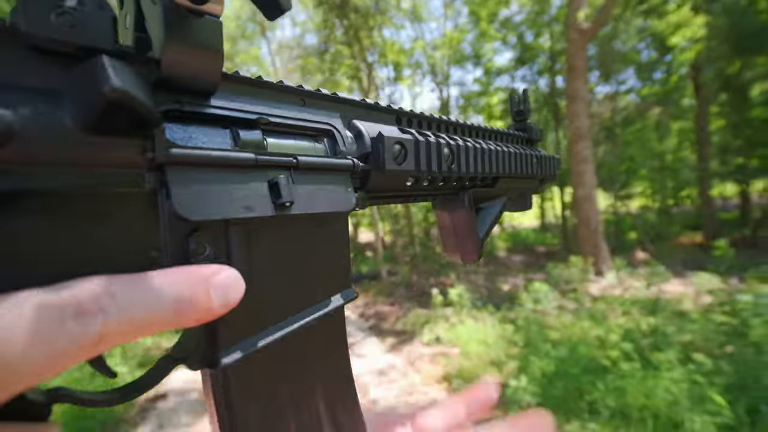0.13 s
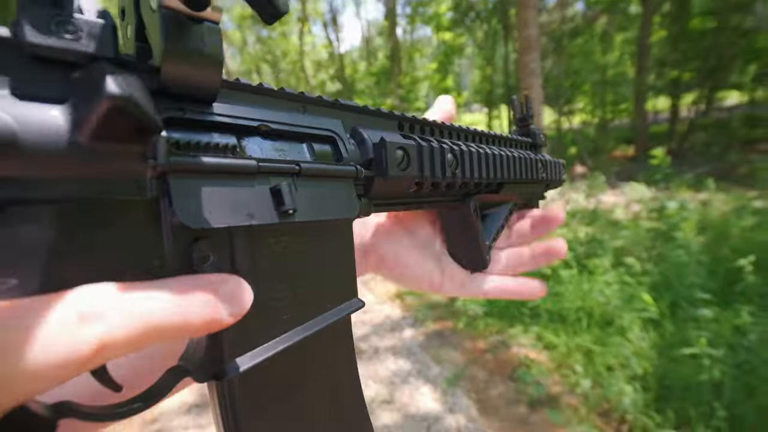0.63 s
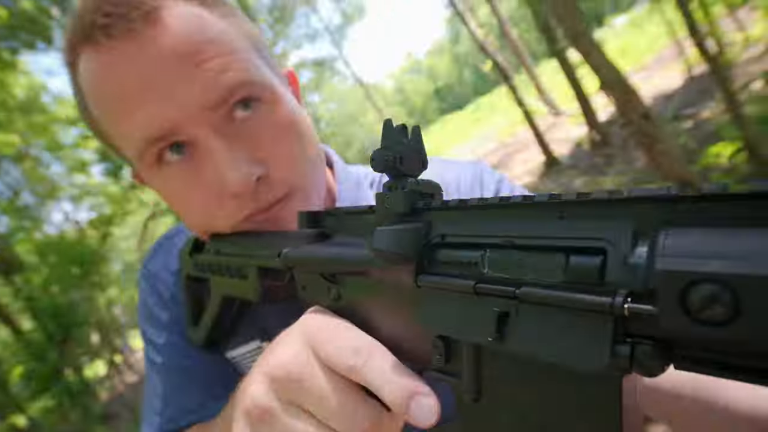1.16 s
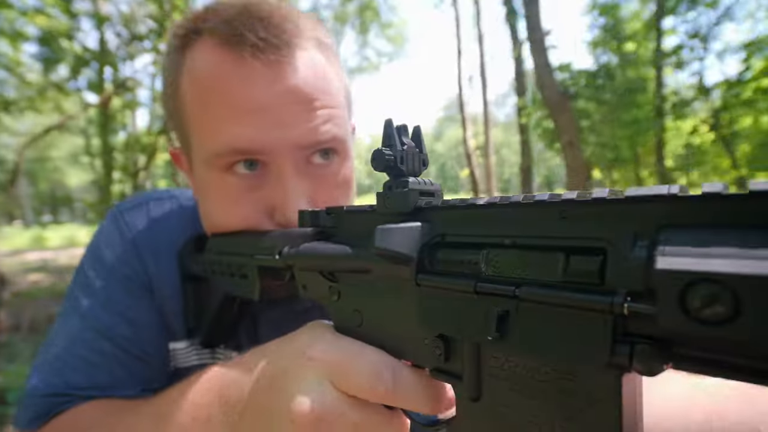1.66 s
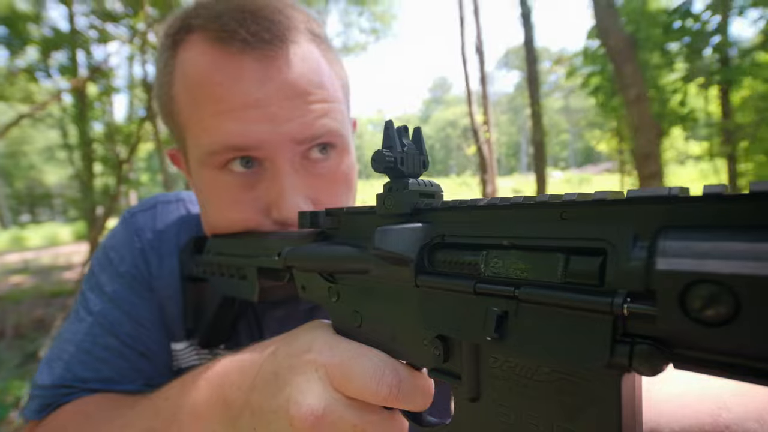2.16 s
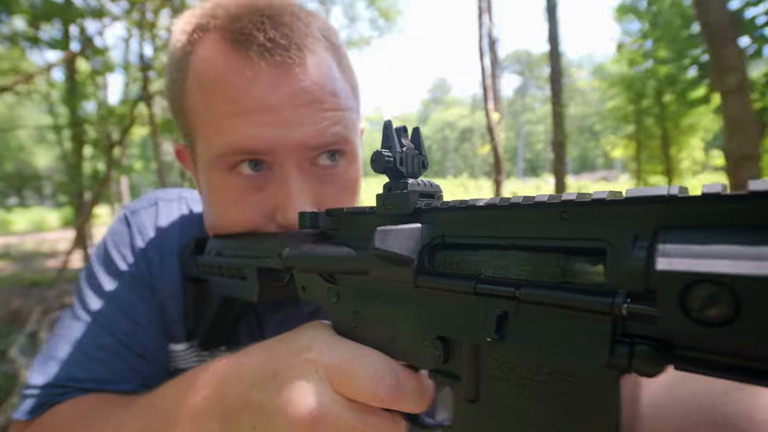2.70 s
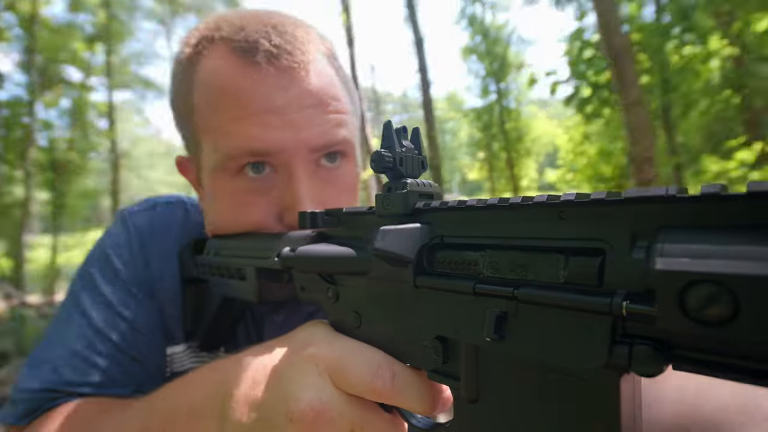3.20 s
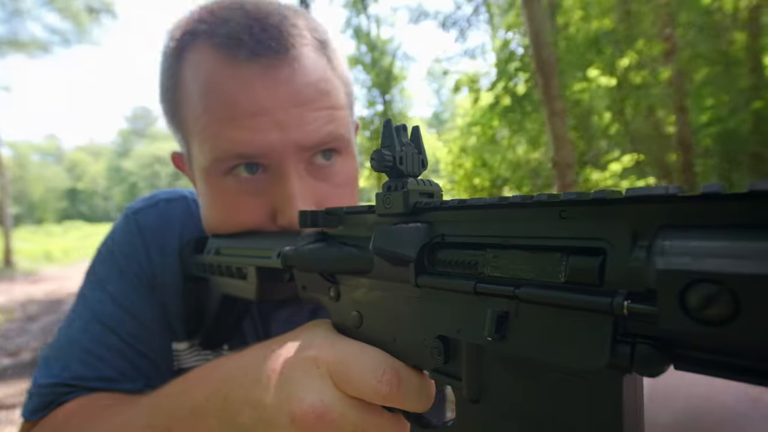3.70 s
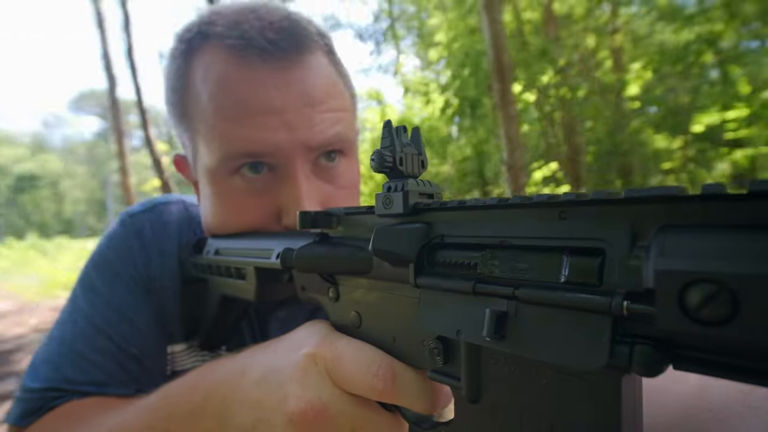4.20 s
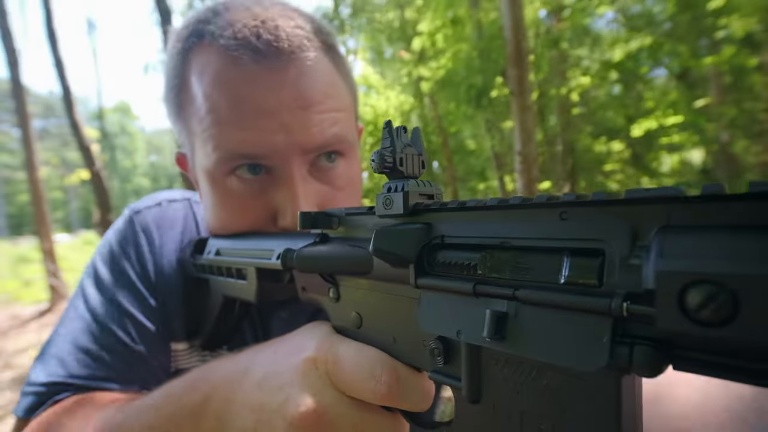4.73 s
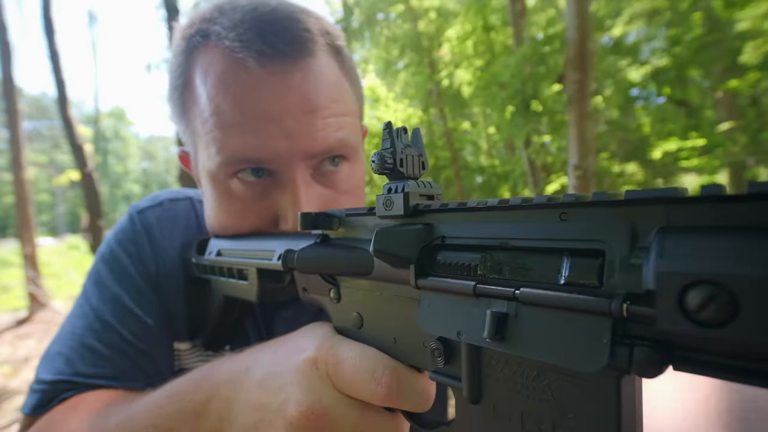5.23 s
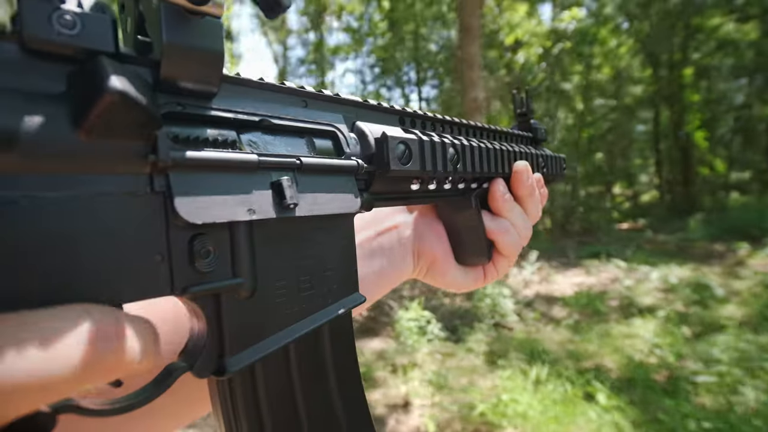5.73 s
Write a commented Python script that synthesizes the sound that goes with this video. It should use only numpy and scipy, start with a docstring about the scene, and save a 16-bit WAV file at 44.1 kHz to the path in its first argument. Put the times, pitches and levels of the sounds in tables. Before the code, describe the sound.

A magazine is slapped into a gas-powered BB rifle, a lever clicks, then eleven sharp, clacking shots crack out unevenly among trees.

```python
"""Gas blowback air rifle among trees

A magazine is slapped home and a lever clicks; then eleven shots, the last cut short by the end.
A cycle: sear tick, valve burst, muzzle pop, bolt slam, bolt return, bounce, at times a trigger reset.
Blows are noise bursts through resonances; gas is pressure pulses and coloured noise, with puffs.
The trees' echo is noise convolved with a decaying tail; hands rustle and wind rumbles."""
import sys
import numpy as np
from scipy import signal
from scipy.fft import rfft, irfft
from scipy.io import wavfile
from scipy.ndimage import uniform_filter1d, map_coordinates

SR = 44100
rng = np.random.default_rng(int(sys.argv[2]) if len(sys.argv) > 2 else 0)


def digitize_waveform(pressure):
    """Quantize a signal to 16-bit integers and store it at the path in sys.argv[1].

    Rows of a 2-D input are taken as channels; values are limited to [-1, 1].
    """
    field = np.atleast_2d(pressure).T
    bounded = np.clip(field, -1, 1)
    quanta = np.round(bounded * 32767).astype(np.int16)
    wavfile.write(sys.argv[1], SR, quanta)


def invert_db(level):
    """Linear amplitude ratio for a level in decibels (20 dB per decade), elementwise."""
    return 10 ** (np.asarray(level, dtype=float) / 20)


N = 258867

# shots: (valve [s], bolt slam [s], bolt return [s], muzzle pop [dB], slam crack [dB], spring ring [dB])
SHOTS = [(2.4273, 2.4422, 2.4626, -10, -3, -30.5), (2.6256, 2.6402, 2.6608, -11, -4.5, -34),
         (2.9578, 2.9715, 2.9907, -10, -6.5, -34.5), (3.1222, 3.135, 3.1546, -12.5, -9, -43.5),
         (3.962, 3.9774, 3.9984, -16.5, -7.5, -38), (4.1423, 4.1579, 4.1782, -18.5, -8.5, -38.5),
         (4.8687, 4.884, 4.9051, -16, -7, -37.5), (5.2172, 5.2333, 5.2539, -18.5, -7.5, -30),
         (5.4001, 5.4164, 5.4372, -20, -6.5, -29), (5.6228, 5.6394, 5.661, -16, -4.5, -29),
         (5.8592, 5.876, 5.897, -22.5, -6, -35)]
# the closed bolt bounces and a small pin rings: (time [s], crack [dB], pin [dB])
BOUNCES = [(2.4718, -34, -60), (2.6739, -29, -43.5), (3.004, -29, -36.5), (3.1677, -27, -41.5),
           (4.0111, -22.5, -36), (4.1932, -28.5, -37), (4.9183, -30, -40), (5.2666, -24.5, -32),
           (5.4505, -29, -32), (5.665, -17.5, -55)]
# the trigger resets and its spring rings: (time [s], crack [dB], body [dB])
RESETS = [(2.0206, -54, -49), (2.5108, -37.5, -42.5), (2.7325, -44, -46.5), (3.222, -48, -50.5),
          (4.2292, -47.5, -50.5), (5.1104, -38.5, -46.5), (5.505, -38.5, -45.5), (5.724, -40.5, -46)]


def in_time(rows):
    """Columns of a (time [s], values ..) curve, interpolated to one value a sample."""
    s, *columns = np.transpose(rows)
    return [np.interp(np.arange(N) / SR, s, column) for column in columns]


def drift(size, span):
    """Slow random wander of unit rms: white noise averaged over span samples."""
    return uniform_filter1d(rng.standard_normal(size), size=span) * np.sqrt(span)


def coloured(points, size, alike):
    """Stereo noise with a (frequency [Hz], level [dB]) spectrum, partly shared by the channels; rms 1."""
    white = rng.standard_normal((3, size))
    mixed = np.sqrt(alike) * white[0] + np.sqrt(1 - alike) * white[1:]
    hz, db = np.transpose(points)
    bin_hz = np.fft.rfftfreq(size, 1 / SR) + 1
    gain = invert_db(np.interp(np.log(bin_hz), np.log(hz), db))
    x = irfft(rfft(mixed) * gain, size)
    return x / x.std()


def resonate(x, modes, tilt_db):
    """Parallel resonances, near unit gain on white noise; the treble leans to the right capsule."""
    out, power = 0, 0
    for k, (hz, width_hz, db) in enumerate(modes):
        r = np.exp(-np.pi * width_hz / SR)
        pan = invert_db(tilt_db * np.log2(7000.0 / hz) * np.array([[.5], [-.5]]))
        zeros = [(1 - r * r) / 2, 0, (r * r - 1) / 2]
        poles = [1, -2 * r * np.cos(2 * np.pi * hz / SR), r * r]
        out = out + (-1) ** k * invert_db(db) * pan * signal.lfilter(zeros, poles, x)
        power += invert_db(db) ** 2 * np.pi * width_hz / SR
    return out / np.sqrt(power)


def add(out, s, shape, lead):
    """Lay a shape so that its sample number lead falls on time s."""
    at = round(s * SR) - lead
    out[..., at:at + shape.shape[-1]] += shape[..., :max(N - at, 0)]


def burst(grains, rise_ms, fall_ms, rattle_db, rattle_ms):
    """One blow: micro-impacts gather, die fast and leave a weaker rattle; energy is set, not left to chance."""
    ms = (np.arange(1500) - 200) / SR * 1000
    after = np.maximum(ms, 0)
    rattle = invert_db(rattle_db) * np.exp(-after / rattle_ms) * (1 - np.exp(-after))
    fading = np.exp(-after / fall_ms) + rattle
    shape = np.where(ms < 0, np.exp(np.minimum(ms, 0) / max(rise_ms, .05)), fading)
    noise = shape * grains
    return noise * np.sqrt(np.sum(shape ** 2) / np.sum(noise ** 2, axis=1, keepdims=True))


def gas():
    """Valve push, muzzle pop and vent hiss: pressure pulses, and noise decaying as the gas escapes."""
    # vent hiss spectrum: (frequency [Hz], relative level [dB per Hz])
    vent_spectrum = [(290, -33), (500, -5), (1040, -8.5), (3110, -8), (3500, -11), (4830, -8), (8300, -4),
                     (8930, -13), (14700, -7.5), (16500, -23)]
    push_db, push_follows_pop, vent_db = -12.0, .36, -26.5
    pop_hz, pop_lead_s = 748.0, .0043
    push, vent = np.zeros((2, N))
    ms = (np.arange(4400) - 300) / SR * 1000
    after = np.maximum(ms, 0)
    # pressure builds, then snaps to suction and swings back
    slow_swing = -.7 * np.exp(-after / 2.0) * np.cos(2 * np.pi * 0.11 * after)
    fast_swing = -0.67 * np.exp(-after / 1.0) * np.sin(2 * np.pi * .7 * after)
    valve = np.where(ms < 0, np.exp(np.minimum(ms, 0) / 0.7), slow_swing + fast_swing)
    # the barrel breathes out in two cycles
    pop = np.sin(2 * np.pi * pop_hz * ms / 1000) * np.exp(-(ms / 0.99) ** 2)
    valve_vent = np.exp(np.minimum(ms, 0) / 1.3 - after / 12.0)
    slam_vent = (ms > 0) * np.exp(-after / 15.3)
    for valve_s, slam_s, _, pop_db, _, _ in SHOTS:
        add(push, valve_s, invert_db(push_db + push_follows_pop * pop_db) * valve, lead=300)
        add(push, slam_s - pop_lead_s, invert_db(pop_db) * pop, lead=300)
        add(vent, valve_s, invert_db(vent_db) * valve_vent, lead=300)
        # the hammer scrapes forward
        add(vent, valve_s - .021, invert_db(vent_db - 21.5) * np.hanning(1100), lead=0)
        add(vent, slam_s, invert_db(vent_db) * slam_vent, lead=300)
    push = signal.lfilter(*signal.butter(1, 3000, fs=SR), push)
    return push, vent * coloured(vent_spectrum, N, alike=.55)


def blows():
    """Every blow inside the action as (time [s], crack [dB], body [dB], rise [ms])."""
    # trigger creak, sear, hammer, valve stem: (time after valve [ms], crack [dB], body [dB], rise [ms])
    valve_blows = [(-22.5, -50, -52, 1.0), (-18, -28, -40, .5), (1, -17, -29, .8), (3.5, -19, -31, .45)]
    # the bolt rebounds off the buffer: (time [s], crack [dB])
    rebound_rows = [(2.4498, -16.5), (2.649, -25), (2.9792, -11.5), (3.1429, -20.5), (3.9841, -19),
                    (4.1667, -23), (4.8923, -20.5), (5.2402, -17), (5.4244, -21), (5.648, -15.5)]
    # loose ticks as the finger works the trigger: (time [s], crack [dB], body [dB])
    tick_rows = [(1.3927, -66, -57), (1.4451, -61.5, -72), (1.9158, -62, -64.5), (1.945, -72, -67),
                 (2.0974, -61, -57.5), (2.1101, -61, -68), (2.1961, -74.5, -64.5), (2.2455, -77.5, -68),
                 (2.2704, -76.5, -60.5), (2.341, -76, -67.5), (2.3908, -62, -49), (2.499, -48, -50),
                 (2.5877, -51, -58.5), (2.9223, -69.5, -58), (2.9378, -44, -53.5), (3.468, -62, -75),
                 (3.868, -69.5, -66), (3.8775, -56.5, -68), (3.8893, -66.5, -65.5), (3.9133, -78.5, -62),
                 (4.0218, -32, -54), (4.1107, -49, -60), (4.6354, -69.5, -71.5), (4.6908, -71.5, -64),
                 (4.7709, -78, -68.5), (4.8299, -58.5, -54.5), (4.939, -34, -47.5), (5.1713, -60, -57.5),
                 (5.3159, -42, -55.5), (5.343, -44, -57.5), (5.578, -61, -51.5), (5.601, -41, -44),
                 (5.8106, -60, -54.5)]
    slam_body_db, bounce_body_db, settling_body_db = -11.5, -8.0, -9   # against the crack
    rebound_body_db = -35
    slam_rise_ms, rebound_rise_ms, tick_rise_ms = .15, .55, .42
    spread_db = 2.0   # no two blows alike
    cycle = []
    for valve_s, _, return_s, _, _, _ in SHOTS:
        cycle += [(valve_s + ms / 1000, *force) for ms, *force in valve_blows]
        cycle.append((return_s, -12.5, -25, .85))   # the bolt closes
        # parts settle 8 to 45 ms after the bolt closes, the later the weaker
        for share in rng.random(3):
            db = -34 + share * (-50 + 34)
            ms = 8 + share * (45 - 8)
            cycle.append((return_s + ms / 1000, db, db + settling_body_db, tick_rise_ms))
    cycle = np.array(cycle)
    cycle[:, 1:3] += spread_db * rng.standard_normal((len(cycle), 2))
    slams = [(s, db, db + slam_body_db, slam_rise_ms) for _, s, _, _, db, _ in SHOTS]
    bounces = [(s, db, db + bounce_body_db, tick_rise_ms) for s, db, _ in BOUNCES]
    rebounds = [(s, db, rebound_body_db, rebound_rise_ms) for s, db in rebound_rows]
    light = [(*row, tick_rise_ms) for row in RESETS + tick_rows]
    return [*cycle, *slams, *rebounds, *bounces, *light]


def contacts():
    """Each blow drives the crack and body resonances and shoves the whole rifle."""
    # crack resonances: (frequency [Hz], width [Hz], relative level [dB])
    crack_modes = [(3060, 680, -8), (4840, 570, -3.5), (6450, 580, 1), (7740, 700, -1), (9140, 1500, -7),
                   (11840, 1500, -8.5), (13500, 670, -11.5), (15400, 460, -12)]
    # body resonances: (frequency [Hz], width [Hz], relative level [dB])
    body_modes = [(416, 220, -5.5), (720, 580, 1.5), (1280, 470, 4.5), (1786, 350, 6), (2370, 930, -1.5)]
    alike, light_loss = 0.47, 0.65
    jolt_db, jolt_ms, snap_db, snap_ms = -11.5, 1.2, 0.5, 0.12
    crack = np.zeros((2, N)) + 1e-18
    body, jolt = np.zeros((2, N)) + 1e-18
    ms = np.arange(-150, 150) / SR * 1000
    shove, snap = np.exp(-(ms / jolt_ms) ** 2), np.exp(-(ms / snap_ms) ** 2)
    rows = blows()
    grains = rng.standard_normal((len(rows), 4, 1500))
    for (s, crack_db, body_db, rise_ms), g in zip(rows, grains):
        g = burst(g, rise_ms, fall_ms=1.0, rattle_db=-20.0, rattle_ms=5.6)
        noise = np.sqrt(alike) * g[0] + np.sqrt(1 - alike) * g[1:3]
        add(crack, s, invert_db(crack_db) * noise, lead=228)
        add(body, s, invert_db(body_db) * g[3], lead=225)
        move_db = body_db + light_loss * min(body_db + 28.0, 0)   # light blows hardly move the rifle
        # both the shove and the first snap pull the pressure down
        add(jolt, s, -invert_db(move_db + jolt_db) * shove - invert_db(move_db + snap_db) * snap, lead=150)
    knock = resonate(body, body_modes, tilt_db=0.52) * invert_db(8.0) + jolt
    return resonate(crack, crack_modes, tilt_db=2.5), knock


def pings():
    """When and how hard the spring and the pin are set ringing, as (time [s], level [dB])."""
    reset_ring_db = -4   # against the body
    return_ring_db = -4.5   # the spring rings again, weaker, at the return
    spring = [(1.096, -48.5)]   # the lever click shakes the spring too
    spring += [(s, body_db + reset_ring_db) for s, _, body_db in RESETS]
    for _, slam_s, return_s, _, _, ring_db in SHOTS:
        spring += [(slam_s, ring_db), (return_s, ring_db + return_ring_db)]
    return spring, [(s, db) for s, _, db in BOUNCES]


def rings():
    """A spring and a pin ring on after some blows: impulses into lightly damped two-pole modes."""
    # ringing modes: (frequency [Hz], relative level [dB], t60 [s], part [0 spring, 1 pin])
    ring_modes = [(991.7, 1.5, 0.079, 0), (1020, -9.5, 0.028, 0), (1624, -9, .04, 0), (1970, -12, .04, 0),
                  (9800, 3.5, 0.062, 1)]
    out, trains = 0, np.zeros((2, N)) + 1e-18
    for train, rows in zip(trains, pings()):
        for s, db in rows:
            add(train, s, invert_db(np.array([db])), lead=0)
    for hz, db, t60_s, part in ring_modes:
        r, w = invert_db(-60 / (t60_s * SR)), 2 * np.pi * hz / SR
        mode = signal.lfilter([0, np.sin(w)], [1, -2 * r * np.cos(w), r * r], trains[int(part)])
        out = out + invert_db(db) * mode
    return out


def rattles():
    """Loose parts rattle around the slaps: a few small clicks at chance moments in each span."""
    # rattling spans: (start [s], end [s], first click [dB], last click [dB], body against click [dB])
    rattle_rows = [(.208, .27, -57, -70, 11.5), (0.388, 0.441, -28, -35, -3),
                   (1.291, 1.345, -71, -59, -2.5)]
    rows = []
    for start, end, first_db, last_db, body_db in rattle_rows:
        for share, tone in rng.random((4, 2)):
            db = first_db + share * (last_db - first_db)
            centre_hz = 6000 * (0.64 + .5 * tone)
            rows.append((start + share * (end - start), db, db + body_db, centre_hz))
    return rows


def handling():
    """Dry plastic clacks: one sharp cycle, a broad click of its own colour and a loose rattle."""
    # magazine, catch and lever under the hand: (time [s], click [dB], body [dB], click centre [Hz])
    handling_rows = [(0.0374, -54.5, -46.5, 3930), (0.0417, -52.5, -47, 6160), (0.1666, -24, -27.5, 8400),
                     (0.1705, -25.5, -25, 7800), (0.1864, -42, -40.5, 6200), (0.2054, -41.5, -40.5, 5500),
                     (0.223, -52, -42, 4800), (0.3949, -13, -13.5, 7100), (0.404, -25, -11, 6900),
                     (0.4063, -13.5, -23, 8400), (0.416, -26, -27, 6200), (0.4258, -23, -31.5, 6400),
                     (0.952, -65, -61.5, 3500), (1.0587, -74, -65.5, 7380), (1.0907, -31, -56, 9560),
                     (1.0948, -23.5, -36, 4660), (1.3266, -44.5, -65.5, 9800), (1.3341, -40, -55.5, 7500)]
    # grip resonances: (frequency [Hz], width [Hz], relative level [dB])
    grip_modes = [(272, 140, -13), (537, 230, -10), (910, 270, -3.5), (1480, 280, -1.5), (2000, 170, -3),
                  (2610, 380, -9.5)]
    alike, snap_db, snap_khz, rise_ms = .6, 6.0, 2.0, .46
    out, body = np.zeros((2, N)), np.zeros(N) + 1e-18
    ms = np.arange(-60, 60) / SR * 1000
    snap = np.sin(2 * np.pi * snap_khz * ms) * np.exp(-(ms / 0.19) ** 2)
    rows = handling_rows + rattles()
    grains = rng.standard_normal((len(rows), 4, 1500))
    for (s, click_db, body_db, centre_hz), g in zip(rows, grains):
        g = burst(g, rise_ms, fall_ms=1.0, rattle_db=-16.5, rattle_ms=6.9)
        noise = np.sqrt(alike) * g[0] + np.sqrt(1 - alike) * g[1:3]
        click = resonate(noise, [(centre_hz, .9 * centre_hz, 0)], tilt_db=3.5)
        add(out, s, invert_db(click_db) * click, lead=205)
        add(out, s, invert_db(body_db + snap_db) * snap[None], lead=66)
        add(body, s, invert_db(body_db) * g[3], lead=220)
    return out + resonate(body, grip_modes, tilt_db=0.9) * invert_db(1.5)


def thumps():
    """Each thump is a damped swing of pressure, suction first."""
    # palm and knuckles on magazine and grip: (time [s], level [dB], frequency [Hz])
    thump_rows = [(0.166, -28, 18.7), (.166, -36, 160), (.235, -35.5, 420), (.249, -38.5, 680),
                  (.392, -20.5, 24), (.394, -25.5, 150), (.905, -46.5, 450), (1.057, -45, 460)]
    out, t = np.zeros(N), np.arange(6000) / SR
    for s, db, hz in thump_rows:
        add(out, s, -invert_db(db) * np.sin(2 * np.pi * hz * t) * np.exp(-1.4 * hz * t), lead=0)
    return out


def puffs():
    """Vented gas on a capsule: a one-sided pressure lump, quick rise and slower fall."""
    # vented gas brushing each capsule: (time [s], left [dB], right [dB])
    puff_rows = [(2.441, -22, -28.5), (2.639, -32, -37.5), (2.97, -39.5, -22.5), (3.134, -21.5, -19.5),
                 (3.976, -45, -39), (4.157, -46, -42), (4.884, -22, -32), (5.233, -27, -43),
                 (5.415, -29.5, -50), (5.639, -52.5, -39)]
    out, ms = np.zeros((2, N)), np.arange(6000) / SR * 1000
    lump = np.exp(-ms / 26.0) - np.exp(-ms / 1.7)
    for s, left_db, right_db in puff_rows:
        add(out, s, invert_db(np.array([[left_db], [right_db]])) * lump, lead=0)
    return out


def trees(x):
    """Trunks and leaves scatter a diffuse echo; fine colour is smeared, so only loudness is passed on."""
    # colour of the trees' echo: (frequency [Hz], relative level [dB])
    echo_spectrum = [(180, -46.5), (300, -12), (413, -5.5), (807, -7.5), (2360, -12.5), (6670, -7),
                     (13300, -15), (15700, -21.5), (16500, -37.5)]
    t60_s, build_up_s = 0.53, .02
    t = np.arange(SR) / SR
    patches_db = 2.5 * drift(SR, 500)   # single trunks answer louder
    envelope = invert_db(-60 * t / t60_s + patches_db) * (1 - np.exp(-(t / build_up_s) ** 2))
    tail = coloured(echo_spectrum, SR, alike=0.25) * envelope
    loudness = uniform_filter1d(np.abs(np.diff(x.mean(axis=0), prepend=0)), size=20)
    smeared = loudness * rng.standard_normal(N)
    return invert_db(-58.0) * signal.fftconvolve(smeared[None], tail, axes=1)[:, :N]


def rubbing():
    """Hand and cloth on the rifle: dull rubbing and fine hiss, both noise of uneven loudness."""
    # hand and cloth, then still: (time [s], dull rubbing before trim [dB], fine hiss [dB])
    rubbing_curve = [(0, -61, -75), (.07, -67, -82), (.3, -63, -75), (.36, -65.5, -78), (.48, -57, -66),
                     (.56, -70.5, -84.5), (.76, -59.5, -63), (.88, -65.5, -80.5), (1.0, -63.5, -68),
                     (1.04, -67.5, -79.5), (1.15, -67, -78), (1.18, -82, -92), (1.45, -77, -87),
                     (1.65, -71.5, -72), (1.7, -76.5, -86), (1.9, -71.5, -82.5), (2.2, -76.5, -92),
                     (3.3, -84, -91), (5.87, -82.5, -92)]
    # dull rubbing spectrum: (frequency [Hz], relative level [dB per Hz])
    rustle_spectrum = [(59, -31), (100, 1.5), (271, -9.5), (304, -9.5), (911, -13), (1260, -19),
                       (1840, -16), (5000, -31.5), (6500, -59.5), (11000, -120)]
    # fine hiss spectrum: (frequency [Hz], relative level [dB per Hz])
    hiss_spectrum = [(1500, -24.5), (3000, -5.5), (5000, -3.5), (8500, -2), (15000, -9.5), (16500, -26.5)]
    rub_db, hiss_db = in_time(rubbing_curve)
    grain = invert_db(1.5 * drift(N, 900))   # skin sticks and slips
    folds = invert_db(2.5 * drift(N, 2500))   # cloth folds scrape in bursts
    dull = folds * invert_db(rub_db - 1.0) * coloured(rustle_spectrum, N, alike=0.85)
    return grain * (dull + invert_db(hiss_db) * coloured(hiss_spectrum, N, alike=.5))


def scrapes():
    """Fingers on ribbed plastic: noise in one broad resonance, swelling and fading."""
    # drags over the ribs: (start [s], end [s], centre [Hz], level [dB])
    scrape_rows = [(.84, .91, 900, -64), (.975, 1.025, 1950, -63), (1.57, 1.685, 2700, -78),
                   (1.8, 1.9, 600, -76)]
    out = np.zeros((2, N))
    for start, end, centre_hz, db in scrape_rows:
        size = round((end - start) * SR)
        noise = rng.standard_normal(8000)[:size]
        drag = resonate(noise, [(centre_hz, .3 * centre_hz, 0)], tilt_db=0)
        add(out, start, invert_db(db) * np.hanning(size) * drag, lead=0)
    return out


def wind():
    """Wind turbulence on the microphone ports: low rumble with a varying level."""
    # rumble on the ports: (time [s], level [dB])
    wind_curve = [(0, -52), (.3, -50.5), (.5, -49), (.9, -48.5), (1.1, -48.5), (1.19, -65), (1.45, -67.5),
                  (1.65, -54), (1.9, -64.5), (2.3, -66.5), (3.4, -73.5), (5.87, -67.5)]
    wind_db, = in_time(wind_curve)
    spectrum = [(5, -8.5), (12, 2.5), (25, -2), (50, -10.5), (100, -22), (300, -54.5)]   # (Hz, dB)
    return invert_db(wind_db) * coloured(spectrum, N, alike=.7)


def birds():
    """Faint gliding whistles, slightly rough: swept sines with a wavering amplitude."""
    # whistles: (start [s], end [s], from [Hz], to [Hz], level [dB])
    bird_rows = [(.088, .15, 3853, 3154, -72), (1.19, 1.262, 3480, 5060, -83.5)]
    out = np.zeros(N)
    for start, end, from_hz, to_hz, db in bird_rows:
        hz = np.linspace(from_hz, to_hz, round((end - start) * SR))
        rough = 1 + .5 * drift(4000, 60)[:len(hz)]
        whistle = np.sin(2 * np.pi * np.cumsum(hz) / SR)
        add(out, start, invert_db(db) * np.hanning(len(hz)) * rough * whistle, lead=0)
    return out


def hum():
    """A distant machine: steady sines of random phase."""
    # machine tones: (frequency [Hz], level before trim [dB])
    hum_tones = [(86.1, -87.5), (123.8, -82), (150.7, -88.5), (500.6, -94.5)]
    t = np.arange(N) / SR
    return sum(invert_db(db + 3.5) * np.sin(2 * np.pi * (hz * t + rng.random())) for hz, db in hum_tones)


def still_air():
    """Steady faint coloured noise."""
    # still air spectrum: (frequency [Hz], relative level [dB])
    air_spectrum = [(35, -30), (60, -1.5), (147, -3.5), (297, -26.5), (403, -20), (509, -13), (675, -21),
                    (1500, -36.5), (15000, -36), (16500, -48)]
    return invert_db(-77.5) * coloured(air_spectrum, N, alike=0.55)


def late(x, lag_ms):
    """Sound reaches the left capsule later: a fractional delay by spline interpolation."""
    left = map_coordinates(x[0], [np.arange(N) - lag_ms * SR / 1000], order=3)
    return np.array([left, x[1]])


def scene():
    """All layers; sound reaches the right capsule first."""
    # the rifle moves to one side: (time [s], left lag [ms])
    left_lag = [(0, 0.026), (1.16, 0.043), (1.18, 0.11), (5.87, 0.094)]
    push, vent = gas()
    crack, knock = contacts()
    lag_ms, = in_time(left_lag)
    # pressure pulses and the body's knock come from nearer the middle
    middle = push * invert_db([[.4], [-.4]]) + knock
    beside = crack + vent + trees(crack + vent + middle) + rings() + handling() + puffs() + thumps()
    beside = beside + rubbing() + scrapes() + wind() + birds() + hum() + still_air()
    return late(beside, lag_ms) + late(middle, .05)


def low_pass(x):
    """Removes everything above the highest recorded frequency."""
    return signal.sosfilt(signal.butter(12, 17150, fs=SR, output="sos"), x)


def record(dry):
    """The microphone lets slow pressure sag back, rounds the peaks and drops the top."""
    sagged = signal.lfilter(*signal.butter(1, 1.7, "high", fs=SR), dry)
    rounded = 1.1 * np.tanh(sagged / 1.1)
    mix = signal.sosfilt(signal.cheby2(14, 60, 17200, fs=SR, output="sos"), rounded)
    return low_pass(mix)


dry = scene()
out = record(dry)
digitize_waveform(out)
```